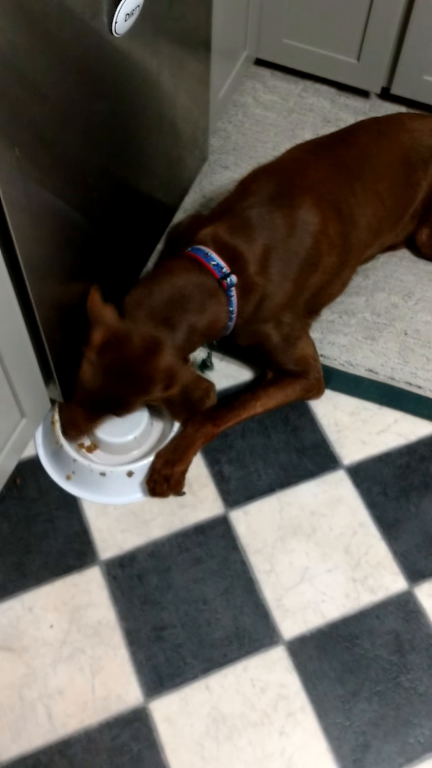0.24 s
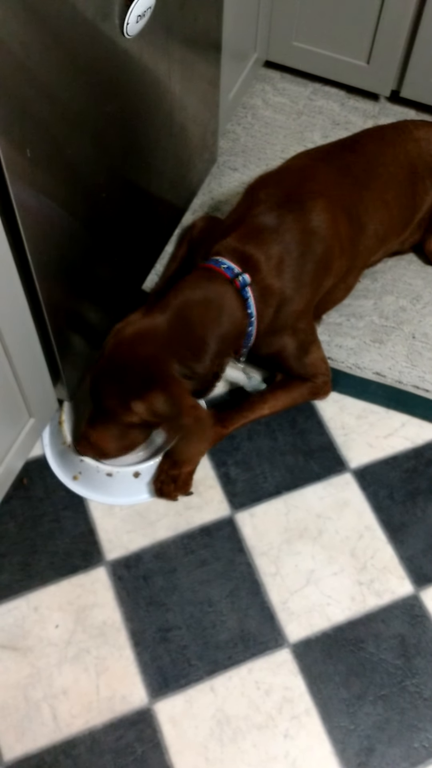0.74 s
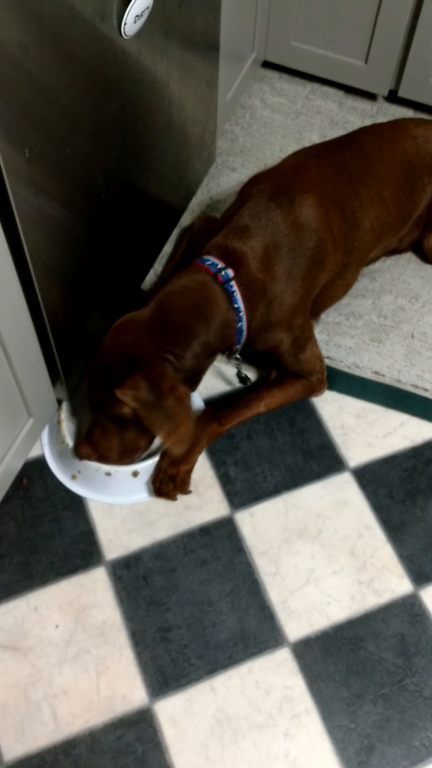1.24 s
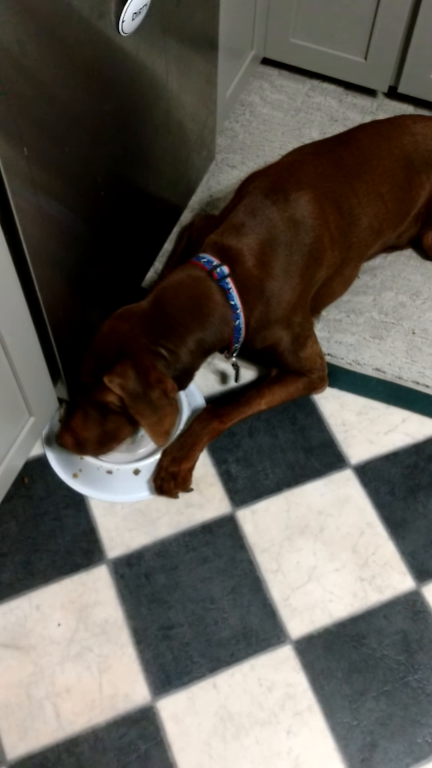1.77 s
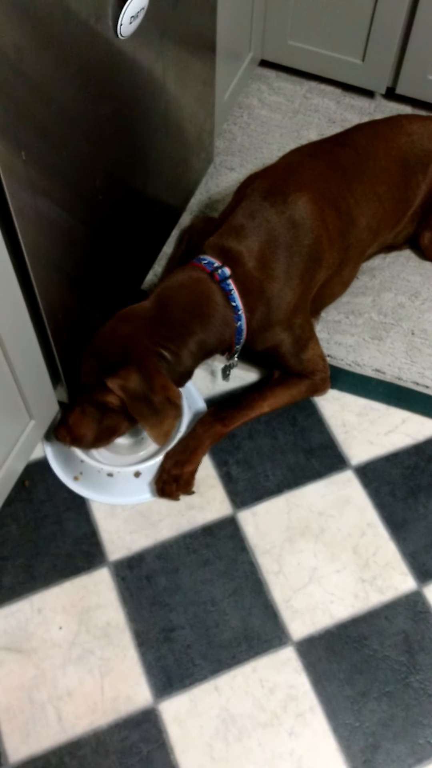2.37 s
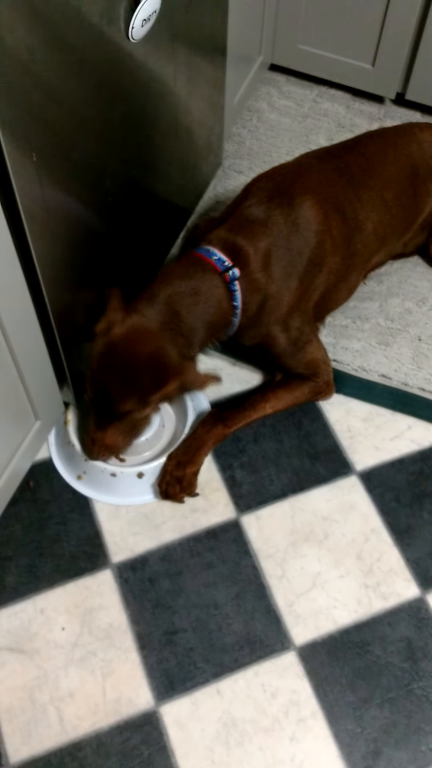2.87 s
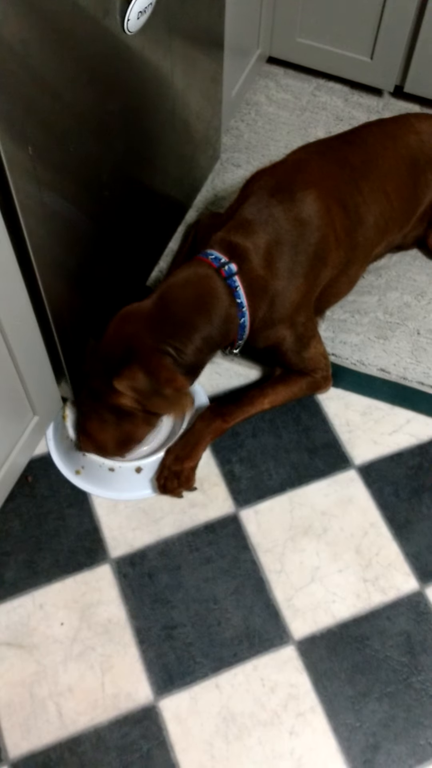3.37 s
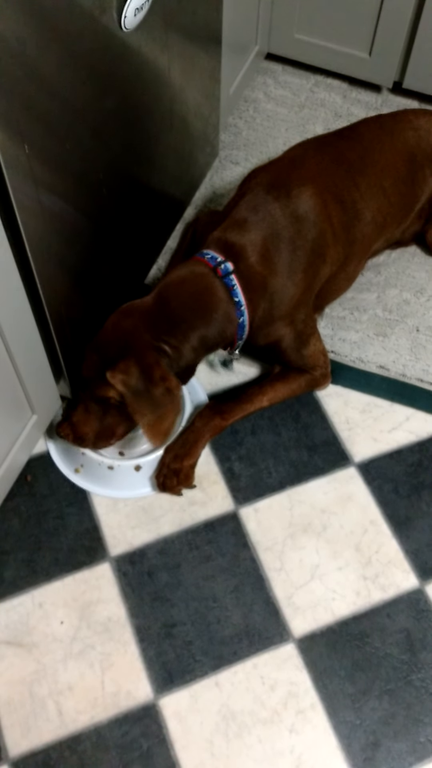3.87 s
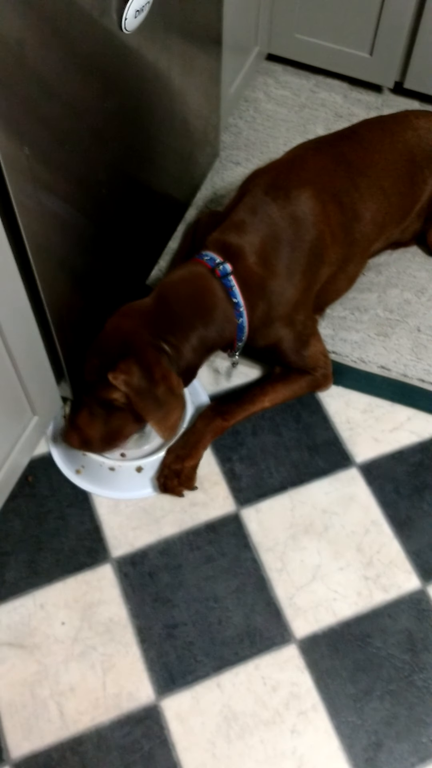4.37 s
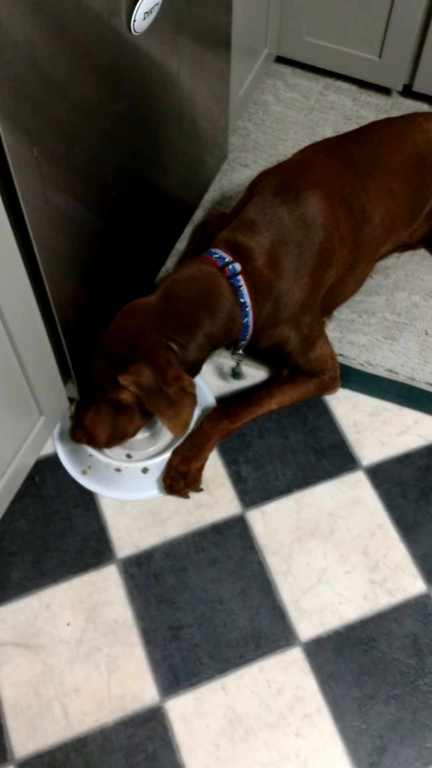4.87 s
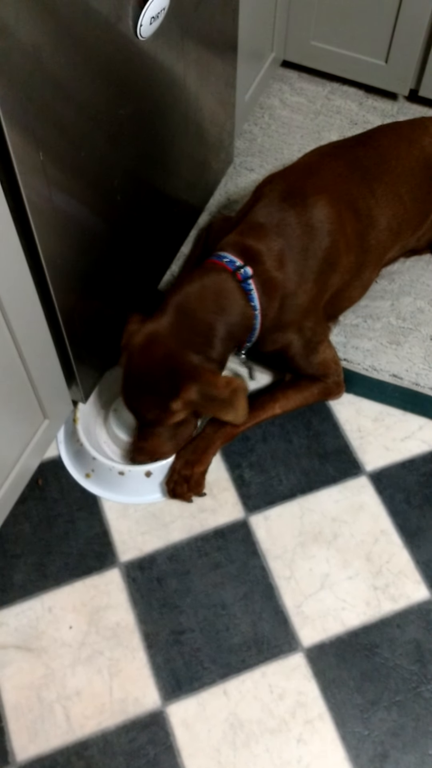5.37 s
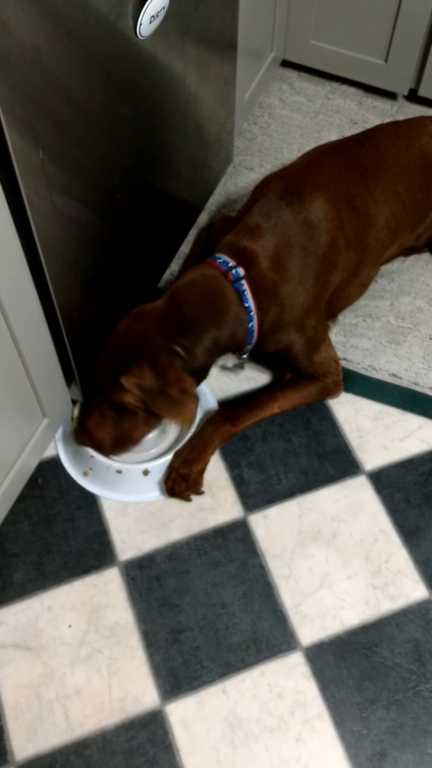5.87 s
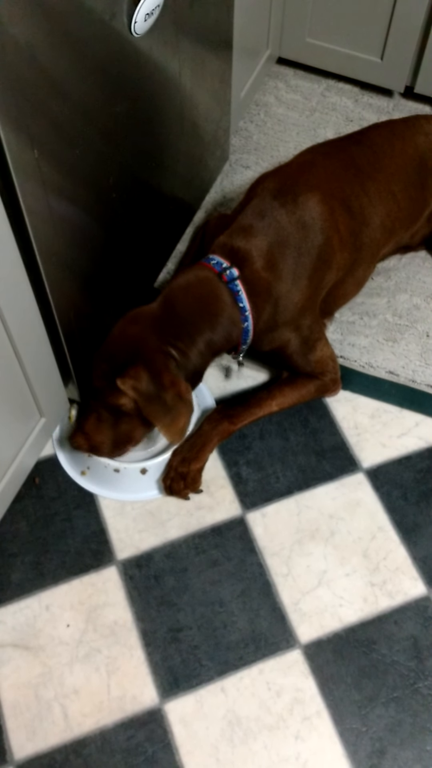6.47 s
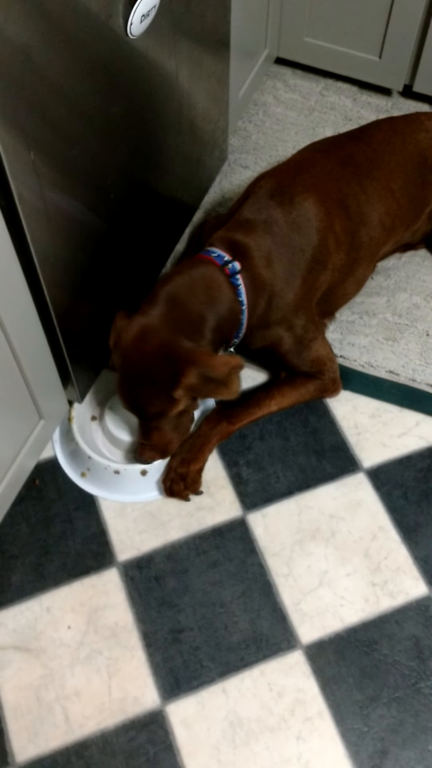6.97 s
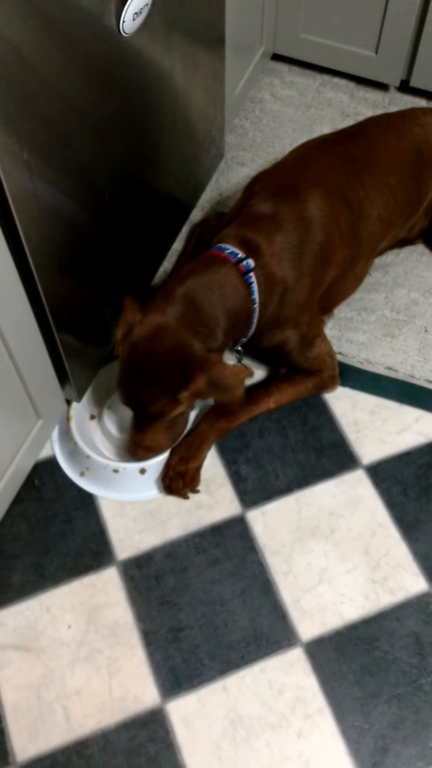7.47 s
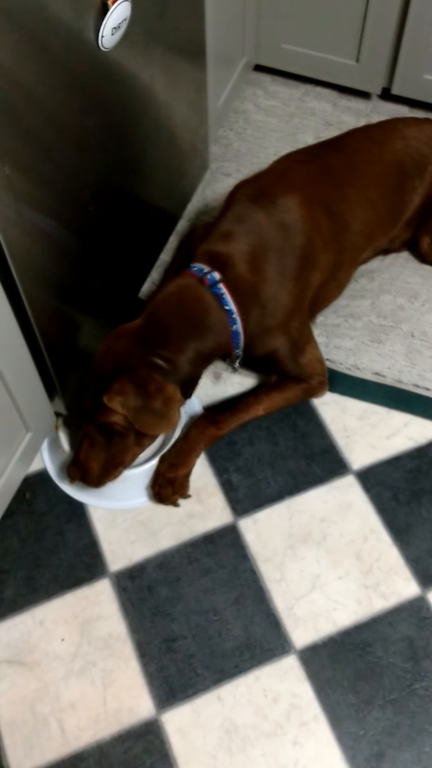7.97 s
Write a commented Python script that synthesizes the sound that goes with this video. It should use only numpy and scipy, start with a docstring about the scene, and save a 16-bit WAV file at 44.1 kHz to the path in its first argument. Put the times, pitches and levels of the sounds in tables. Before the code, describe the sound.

Close to a dog finishing its kibble: sticky tongue pops, saliva crackle and occasional dry cracks of kibble. Thin, very high collar tags clink irregularly throughout. The plastic bowl stand thuds and scuffs in the first seconds, rests, then knocks loudly past the middle and again near the end. The steel dish rings clearly once and scrapes softly. Small hard-floored kitchen, brief reflections, quiet steady air.

```python
"""Dog licking a steel dish clean

A dog licks the last kibble from a steel dish in a plastic stand on a kitchen floor.
Shoves of the muzzle make the stand knock and judder, built from ringing modes and a slipping tone.
Collar tags and the steel dish ring as sets of fading sine waves, started by short contacts.
Smacks and crumbs are gliding or steady pops; licks are sparse clicks shaped by filters.
Floor and cupboards add echoes, with a short room tail and a quiet steady hiss around it all."""
import sys
import numpy as np
from scipy import signal
from scipy.fft import rfft, irfft, next_fast_len
from scipy.io import wavfile

SR = 44100
rng = np.random.default_rng(int(sys.argv[2]) if len(sys.argv) > 2 else 0)


def pcm_store(signal):
    """Save signal as 16-bit PCM."""
    levels = np.round(np.clip(np.atleast_2d(signal), -1, 1) * 32767)
    wavfile.write(sys.argv[1], SR, levels.astype(np.int16).T)


N = 362502
T = np.arange(SR // 2) / SR  # time within one event, in seconds

# All levels in the tables are relative: later gains, filters and the room still act on them.
# Shoves of the muzzle against the stand: start_s, shove_db, floor_thud_db, rim_clack_db,
# judder_db (relative to the shove), slip_hz (middle of a slowing glide)
SHOVES = [(0.0817, -32.5, -29.5, -32, 5.5, 739), (0.1705, -39, -46, -23, -14, 784),
          (0.3332, -29, -29, -27, -10, 713), (0.778, -59, -48, -65, -5, 716),
          (1.1443, -30, -28, -40, -6, 760), (1.5956, -21.5, -26, -17, -5, 817),
          (2.1471, -47, -43.5, -53, -5, 806), (2.63, -46.5, -43, -28, 0, 676),
          (4.203, -53, -58, -40, -3, 800), (5.199, -40.5, -42.5, -56, -22, 920),
          (5.3255, -26, -23, -16.5, 6.5, 801), (5.3695, -41, -33, -39, -6, 790),
          (5.4064, -35.5, -38.5, -27, -16, 810), (5.55, -46.5, -51, -40, -21, 810),
          (5.683, -50, -38, -37, -7, 667), (5.7261, -22, -24, -11, 6.5, 778),
          (7.1931, -32.5, -36.5, -24.5, -7, 800), (7.3187, -28, -19.5, -12.5, 15, 769)]
# Ringing modes of the plastic stand: pitch_hz (before a small random shift), level_db, fade_60db_s
STAND_MODES = [(80, -29, .12), (155, -15, .13), (195, -18, .08), (228, -11, .13), (256, -4, .12),
               (283, -7, .11), (314, -11, .09), (398, 3, .09), (440, -11, .04), (530, -10, .085),
               (620, -17, .04), (720, -9, .04), (830, -10, .04), (972, -8, .08), (1130, -15, .05),
               (1210, -16, .05), (1320, -19, .05), (1420, -19, .05), (1575, -19, .12), (1705, -19, .18),
               (2330, -27, .16)]
# Clinks of the collar tags: start_s, first_tag_db, second_tag_db, bright_pair_db, middle_group_db,
# low_group_db, ring_time_factor
TAG_CLINKS = [(0.1246, -43, -45, -43.5, -49, -39.5, 1.14), (0.247, -36, -42, -34, -50, -47.5, 1.5),
              (0.266, -53, -52, -54, -49, -65, 1.0), (0.282, -61, -54, -56, -47, -48, 2.4),
              (0.4273, -41, -47, -30.5, -62, -49, 1.6), (0.4713, -47, -42, -53, -49, -46, 2),
              (0.5107, -65, -55, -60, -66, -58, 1.6), (0.735, -40, -34, -28, -44, -58, 1.1),
              (0.748, -49, -49, -56, -57, -37, 1.8), (0.7574, -51, -43, -59, -41.5, -66, 1.5),
              (0.787, -62, -61, -56, -64, -61, 1.0), (0.833, -37, -35, -38.5, -37.5, -52, 0.74),
              (0.847, -57, -57, -66, -67, -68, 1.0), (0.8764, -44, -41, -46, -54, -45.5, 0.52),
              (0.897, -62, -63, -61, -71, -54, 0.99), (1.06, -50, -53, -47, -54, -52, 0.8),
              (1.1372, -50, -54, -46, -55, -54, 1.0), (1.1872, -54, -54, -59, -41, -47, 0.85),
              (1.325, -52, -54, -54, -54, -58, 0.85), (1.407, -61, -61, -55, -75, -54.5, 1.7),
              (1.7558, -43, -45, -50.5, -46.5, -56, 1.1), (2.348, -55, -55, -54, -51, -63, 2.1),
              (2.564, -56, -54, -52, -46.5, -65, 1.7), (2.959, -52, -53, -52, -52, -54, 0.84),
              (3.014, -57, -58, -55, -59, -53, 1.3), (3.148, -54, -50, -49.5, -50, -55.5, 2.3),
              (3.281, -48, -51, -50, -41, -54, 1.3), (3.326, -50, -49, -55, -46.5, -58, 1.3),
              (3.41, -55, -60, -57, -61, -57, 1.4), (3.481, -51, -46, -62, -47, -42.5, 0.99),
              (3.7167, -48, -42, -44, -36, -44.5, 0.99), (3.8782, -37, -36, -41, -57, -47, 0.6),
              (4.027, -43, -57, -44, -39, -45, 1.7), (4.0583, -35, -44, -37, -42, -45.5, 0.88),
              (4.144, -46, -47, -49, -51.5, -46.5, 1.6), (4.218, -48, -46, -52, -47, -53, 0.89),
              (4.6122, -49, -54, -50, -43, -65, 0.73), (4.779, -48, -46, -49, -44, -55, 0.75),
              (4.998, -48, -49, -45, -50, -47.5, 1.2), (5.008, -52, -50, -62, -69, -68, 0.96),
              (5.083, -63, -63, -59, -51, -65, 1.0), (5.138, -56, -59, -58, -58, -60, 0.9),
              (5.259, -63, -60, -59, -55, -63, 2.5), (5.419, -58, -58, -61, -76, -75, 1.0),
              (5.7568, -46, -42, -39.5, -45, -45, 0.69), (5.7875, -43, -39, -41, -39, -41.5, 1.44),
              (5.9526, -41, -33.5, -44.5, -54, -42, 0.91), (5.98, -56, -56, -69, -45.5, -45, 1.1),
              (6.0136, -53, -53, -62, -40, -64, 1.1), (6.14, -47, -46, -41.5, -53, -49, 1.4),
              (6.239, -49, -56, -51, -73, -55, 0.9), (6.626, -53, -48, -56, -46.5, -56, 0.97),
              (6.7845, -52, -52, -45, -49, -46.5, 0.81), (6.802, -53, -53, -69, -45, -56, 0.87),
              (6.928, -55, -55, -60, -56, -56, 0.87), (7.042, -63, -65, -64, -69, -63, 1.1),
              (7.103, -61, -62, -81, -69, -76, 1.1), (7.425, -58, -59, -53, -59, -60, 0.84),
              (7.473, -45, -53, -45, -61, -57, 1.2), (7.5335, -54, -47, -55, -54, -58, 0.84),
              (7.582, -59, -56, -63, -62, -60, 0.91), (7.629, -59, -56, -49.5, -49, -62, 1.2),
              (7.755, -66, -66, -63, -60, -68, 0.93), (7.88, -50, -50, -53, -63, -50, 1.3),
              (7.901, -50, -48, -41.5, -74, -43.5, 1.1), (7.935, -55, -53, -64, -54, -49, 1.0)]
# Ringing modes of the tags: pitch_hz (before a small random shift), level_db,
# fade_60db_s (before the clink's factor and random grip),
# family (0 first tag, 1 second tag, 2 bright pair, 3 middle group, 4 low group)
TAG_MODES = [(14560, -1, .09, 0), (15600, -1, .1, 0), (8732, -13, .07, 1), (14280, 0, .11, 1),
             (15730, -4, .13, 1), (12230, -1.5, .11, 2), (12280, -4, .05, 2), (9815, 0, .06, 3),
             (9730, -2, .035, 3), (9500, -2, .012, 3), (6115, -1, .06, 4), (6235, -6, .3, 4),
             (6060, -4, .04, 4), (6710, -3, .03, 4)]
# Touches on the steel dish: start_s, strength_db, softness (0 is neutral), scrape (0 to 1),
# scrape_length_s (time constant of the chatter)
DISH_TOUCHES = [(2.6131, -18.5, 0.19, 0.11, 0.0039), (2.631, -38, 0.12, 0.03, 0.0017),
                (3.415, -47.5, 1.43, 0.23, .003), (3.428, -42, 0.33, 0.3, 0.0026),
                (3.457, -37.5, 0.1, 0.7, .004), (3.5005, -36.5, 0.3, 0.8, .003),
                (3.51, -42, 0.39, 1, 0.0057), (5.324, -43.5, 1.5, 0.42, 0.0098),
                (5.703, -39, 0.45, 0.35, 0.0061), (7.314, -41.5, 0.42, 0.5, .01)]
# Ringing modes of the dish: pitch_hz, level_db, fade_60db_s (for a clean blow)
DISH_MODES = [(1701, -32, .5), (1745, -32, .2), (2611, -35, .3), (3208, -20, .35), (3532, -26, .35),
              (3589, -12.5, .4), (3612, -21, .25), (4568, -14, .2), (4613, -21, .2), (4880, -10, .12),
              (4926, 2.5, .165), (5028, -6, .17), (5110, -12, .14), (5286, -17, .18), (5690, -16, .1),
              (5766, -7, .2), (5815, -13, .12), (5862, -9, .18), (5990, -11, .2), (6115, -13, .17),
              (6207, -15, .22), (6720, -19, .12), (6944, -19, .15), (7224, -14, .12), (7800, -24, .2),
              (8424, -29, .2)]
# Teeth closing on kibble: start_s, strength_db, dish_contact (0 to 1)
KIBBLE_BITES = [(0.171, -42, 1), (0.334, -34.5, 0.87), (0.6485, -46, 0.66), (1.148, -40.5, 0.1),
                (1.6976, -42.5, 0.14), (2.0874, -48, 1), (2.273, -42, 0.43), (2.614, -40, 0.9),
                (3.1023, -45.5, 0.54), (3.2748, -42, 0.86), (3.698, -46, 0), (4.1871, -47, 1),
                (4.2018, -47, 1), (4.6561, -37, 0.83), (5.4529, -42.5, 0.2), (6.2355, -35, 0.78),
                (6.648, -40, 0.1), (7.056, -49, 0.3), (7.4032, -49, 1), (7.251, -49.5, 0.7),
                (8.0558, -38.5, 0.5)]
# Tongue smacks: start_s, strength_db, cavity_pitch_hz (centre of the rising glide)
TONGUE_SMACKS = [(0.648, -36, 870), (0.664, -43, 820), (0.849, -42.5, 920), (1.029, -43.5, 900),
                 (1.821, -43, 782), (2.086, -36.5, 1270), (2.761, -40, 930), (2.894, -41, 704),
                 (3.146, -48.5, 870), (3.697, -38, 895), (3.891, -40, 1460), (4.051, -40, 800),
                 (4.07, -40.5, 890), (4.186, -35.5, 1504), (4.201, -43, 910), (4.291, -34, 860),
                 (4.367, -44, 1550), (4.573, -38.5, 826), (4.844, -44.5, 795), (5.054, -40.5, 820),
                 (5.067, -39.5, 980), (5.187, -33.5, 1006), (5.199, -37, 1125), (6.657, -43.5, 776),
                 (6.802, -38.5, 1080), (6.884, -45, 1140), (7.11, -45, 960), (7.82, -42.5, 874),
                 (8.056, -35, 850)]
# Wet tongue strokes: mark_s (the sound starts 8 ms earlier), strength_db,
# spray_db (relative to the strength), length_s
TONGUE_STROKES = [(1.027, -42.5, -13.5, 0.031), (1.495, -50, -10, 0.028), (2.218, -45, -19, 0.034),
                  (2.511, -43, -23, 0.037), (2.837, -48.5, -17, 0.11), (2.968, -42.5, -5.5, 0.041),
                  (3.406, -42.5, -25, 0.04), (3.597, -42.5, -26, 0.031), (3.892, -45, -32, 0.024),
                  (4.361, -42, -35, 0.02), (4.53, -52.5, -2.5, 0.045), (4.83, -44.5, -12, 0.02),
                  (5.047, -43, -19, 0.027), (6.105, -42, -31, 0.048), (6.429, -44.5, -36, 0.071),
                  (6.65, -46, -18, 0.067), (6.799, -49, -33, 0.064), (7.056, -41, -13, 0.039),
                  (7.807, -44.5, -20, 0.053)]
# How busily the tongue works between strokes: time_s, level_db
TONGUE_EFFORT = [(0.0, -47.5), (0.2, -50), (0.89, -68), (1.14, -56), (2.83, -51.5), (2.95, -60),
                 (5.91, -53), (6.14, -57), (7.08, -58), (7.38, -48), (7.74, -55), (8.2, -54.5)]
# Soaked crumbs giving way: start_s, strength_db, pitch_hz
CRUMB_BREAKS = [(0.602, -42.5, 1860), (1.1552, -36.5, 1390), (1.283, -39, 2650), (1.2992, -39, 1930),
                (1.7268, -35, 2220), (1.7706, -47, 1530), (2.614, -31.5, 1273), (2.97, -43, 1540),
                (2.982, -42.5, 3220), (3.2338, -35.5, 1940), (3.787, -39, 4170), (3.911, -43, 1570),
                (4.248, -44.5, 1390), (4.377, -46.5, 2960), (6.4822, -49, 1090), (6.697, -44, 898),
                (7.0552, -44, 3260), (7.067, -42, 3100), (7.082, -36.5, 2410), (7.115, -41, 1710),
                (7.147, -52, 1960), (7.309, -35.5, 2020), (8.0558, -32, 1640)]
# Tone colour of wet sound inside the mouth: pitch_hz, level_db per Hz
MOUTH_COLOUR = [(30, -59), (100, -22), (400, -1), (850, 13), (1150, 3.5), (1500, 0), (2000, 4.5),
                (2500, -11), (3200, -5.5), (8000, -7), (16000, -9)]
# Tone colour of bright spray and snaps: pitch_hz, level_db per Hz
SPRAY_COLOUR = [(100, -7), (1500, -34), (3000, -6.5), (5000, 9.5), (7500, 10), (11000, 2.5), (16000, -23)]
# Tone colour of the quiet kitchen: pitch_hz, level_db per Hz
HUSH_COLOUR = [(20, -14), (45, -5.5), (75, 2.5), (130, 1), (220, 6.5), (400, 3.5), (650, -4), (1200, -9),
               (2000, -17), (3200, -18), (5500, -17.5), (10000, -10.5), (16000, -15.5)]
# Modes of a tooth's tap on the dish: pitch_hz, level_db, fade_60db_s
TOOTH_TAP = [(262, -50, 0.075), (512.5, -4.5, 0.085), (855, 6, 0.006)]
# Echoes from floor and cupboards: delay_s, gain (before each source's own share)
NEAR_ECHOES = [(.0037, 0.65), (.0076, 0.23), (0.01, 0.083), (0.0235, 0.28), (0.04, 0.51)]
# How fast the room tail fades: pitch_hz, fade_60db_s
ROOM_FADE = [(150, 0.23), (400, 0.3), (1000, 0.24), (4000, 0.22), (15000, 0.2)]
# Left-right likeness of diffuse sound: pitch_hz, likeness (limited to -1 to 1 in use)
SIDE_LIKENESS = [(50, -1.12), (130, -0.37), (280, 0.67), (650, 0.87), (1400, 0.6), (3000, 0.66),
                 (16000, -0.79)]
# Level difference between the sides: pitch_hz, left_minus_right_db
SIDE_BALANCE = [(100, -4.5), (280, -4), (600, -1.2), (1100, .9), (4500, -.5), (8000, 2.3), (14000, 1.3)]
# Bands where left and right are in opposite phase, from stereo widening: centre_hz, half_width_hz
OPPOSED_BANDS = [(2200, 500), (4340, 400), (6480, 420), (8570, 440), (13500, 400)]
# Phase between left and right outside those bands: pitch_hz, phase_radians
SIDE_PHASE = [(200, 0.4), (500, -0.3), (1500, 0.3), (3200, 0.05), (7500, 0.3), (9800, 0.9), (12200, 0.1),
              (14500, 1), (16000, 0.3)]

EDGE_HZ = 16050  # upper limit of the sound
# Faint brushes between tags: average rate, relative level of each tag family
GRAZES_PER_S, GRAZE_DB = 2.7, (-55, -51, -52, -72, -85)
SNAP_DB, SNAP_CONTACT_DB = -5, 7  # bright snap in the mouth, and what full dish contact adds
TAP_DB, TAP_CONTACT_DB = -24.5, 35.5  # the same for the tap on the dish
UPPER_HZ, UPPER_SPREAD, UPPER_DB = 1333, 0.093, -11  # second mouth resonance, its variation, level
REBOUNDS, REBOUND_S, REBOUND_GAIN = 4, .034, 0.34  # stand rocking back: count, time span, strength
SPOT_DB, TAG_SPOT_DB = 2, 2  # random spread of mode levels from hit to hit: stand, tags
TAG_GRIP, TAG_BOUNCE = .25, .15  # random spread of tag ring time, strength of a bounce


def amp(db):
    """Turns decibels into gain."""
    return 10 ** (np.asarray(db) / 20)


def unit(x):
    """Scales a sound to an rms strength of 1."""
    return x / np.sqrt(np.mean(x ** 2) + 1e-20)


def read(points, hz):
    """Reads a table by joining its points along a log-frequency axis."""
    f, value = np.transpose(points)
    return np.interp(np.log(hz + 1), np.log(f + 1), value)


def add(mix, s, sound):
    """Mixes a sound in at time s, cutting off what runs past the end."""
    part = mix[max(round(s * SR), 0):][:len(sound)]
    part += sound[:len(part)]


def colour(x, spectrum):
    """Gives a sound a tone colour with a unit-energy filter that never acts ahead of time."""
    log_gain = np.log(amp(read(spectrum, abs(np.fft.fftfreq(2048, 1 / SR)))))
    # The Hilbert transform finds the phase that puts the energy as early as possible.
    response = np.exp(np.conj(signal.hilbert(log_gain)))
    taps = np.fft.ifft(response).real[:1024]
    return signal.oaconvolve(x, taps / np.linalg.norm(taps))[:len(x)]


def ring(hz, db, t60, sign=1):
    """Sets modes ringing with one blow; each is a fading sine starting outward or inward."""
    waves = np.sin(2 * np.pi * np.outer(hz, T))
    fades = np.exp(-np.log(1000) * np.outer(1 / t60, T))
    return (sign * amp(db)) @ (waves * fades)


def burst(t60):
    """A puff of noise that falls by 60 dB in t60 seconds."""
    return rng.standard_normal(len(T)) * np.exp(-np.log(1000) * T / t60)


def crackle(size, per_s, spread_db):
    """Sparse random clicks of very unequal strength."""
    strength = amp(spread_db * np.minimum(rng.exponential(1, size), 4))
    happens = rng.random(size) < per_s / SR
    return unit(strength * rng.standard_normal(size) * happens)


def pop(hz, cycles=3.34, glide=0.16):
    """A film of saliva or a crumb bursts: a few fading cycles that may bend up or down."""
    t = T[:SR // 40]
    age = t * hz / cycles
    bend = glide * rng.standard_normal() * np.tanh(age / 2)
    turns = np.cumsum(hz * (1 + bend)) / SR
    return np.sin(2 * np.pi * turns) * np.exp(-age) * (1 - np.exp(-age * 10))


def diffuse(pair):
    """Mixes two unrelated signals so the likeness of left and right varies with pitch."""
    left, other = rfft(pair)
    same = np.clip(read(SIDE_LIKENESS, np.fft.rfftfreq(pair.shape[1], 1 / SR)), -1, 1)
    right = same * left + np.sqrt(1 - same ** 2) * other
    return irfft([left, right], pair.shape[1])


def hush(level_db=-54.0):
    """The steady air of the kitchen and a fine hiss, made from filtered noise."""
    noise = np.array([colour(v, HUSH_COLOUR) for v in rng.standard_normal((2, N))])
    return amp(level_db) * diffuse(noise)


def licks(mouth_db=-7, steady_db=-6, fizz_db=-13):
    """Saliva crackles in the mouth, faintly all the time and more strongly with each stroke."""
    out = np.zeros(N)
    for s, peak_db, spray_db, length in TONGUE_STROKES:
        stroke = signal.windows.tukey(int(length * SR), .7)
        wet = amp(peak_db + mouth_db) * colour(crackle(len(stroke), 2200, 2.1), MOUTH_COLOUR)
        spray = amp(peak_db + spray_db) * colour(crackle(len(stroke), 6000, 1.5), SPRAY_COLOUR)
        add(out, s - .008, stroke * (wet + spray))
    effort = amp(np.interp(np.arange(N) / SR, *np.transpose(TONGUE_EFFORT)))
    steady = amp(steady_db) * colour(crackle(N, 1500, 1.2), MOUTH_COLOUR)
    fizz = amp(fizz_db) * colour(crackle(N, 1200, 0.49), SPRAY_COLOUR)
    return out + effort * (steady + fizz)


def chewing(level_db=2, per_s=75, spread_db=2.5, centre_hz=1300, spread=0.564):
    """Tiny wet pops at random pitches and moments, stronger when the tongue is busier."""
    out = np.zeros(N)
    times = np.flatnonzero(rng.random(N) < per_s / SR) / SR
    for s in times:
        effort_db = np.interp(s, *np.transpose(TONGUE_EFFORT))
        size_db = effort_db + spread_db * min(rng.exponential(), 3)
        hz = centre_hz * np.exp(spread * np.clip(rng.standard_normal(), -2, 2))
        add(out, s, amp(level_db + size_db) * pop(hz))
    return out


def knocks(level_db=-3, rise=0.001, rattle_db=-11, rim_db=-11, skid_db=6, skid_s=0.01053,
           overtones_db=(-21, -42), deep_db=-7, spot_shift=0.015, sag=0.062):
    """A shove makes the stand judder along the floor and thud; it rocks back and its rim rattles."""
    out = np.zeros(N)
    hz, db, t60 = np.transpose(STAND_MODES)
    progress = np.minimum(T / skid_s, 1)
    # The feet slip at a steady strength, then grip; the slip rate falls along the way.
    sliding = np.tanh(3 * np.sin(np.pi * progress) ** 2)
    slowing = np.cumsum(1 + sag * (1 - 2 * progress)) / SR
    inward = np.where((hz > 350) & (hz < 450), -1, 1)
    rim_colour = [(100, -12), (500, -1), (1000, 0), (1700, -10), (2400, -20), (6000, -29), (16000, -42)]
    for s, body_db, thud_db, clack_db, slip_db, slip_hz in SHOVES:
        judder_db = body_db + slip_db
        # Floor thud drives the low modes, the shove the middle, judder and rim the high ones.
        drive = [(85, thud_db + deep_db), (260, thud_db), (320, body_db), (400, body_db),
                 (550, (body_db + judder_db) / 2 - 1), (700, judder_db), (900, judder_db),
                 (1200, clack_db + rim_db)]
        blow_db = db + read(drive, hz)
        spot, shift = rng.standard_normal((2, len(hz)))  # the muzzle presses on a different spot
        body = ring(hz * (1 + spot_shift * shift), blow_db + SPOT_DB * spot + 4.5, t60, inward)
        slips = sum(amp(d) * np.sin(2 * np.pi * k * slip_hz * slowing)
                    for k, d in enumerate((0, *overtones_db), 1))
        judder = amp(judder_db + skid_db) * sliding * slips
        rattle = colour(crackle(len(T), 900, 2) * np.exp(-T / .011) * 1.1, rim_colour)
        impact = amp(clack_db + rattle_db) * rattle - body
        add(out, s, impact * (1 - np.exp(-T / rise)) - judder)
        for late in rng.uniform(.25, 1, REBOUNDS):
            rock_db = blow_db + SPOT_DB * rng.standard_normal(len(hz))
            rock = ring(hz, rock_db, t60 / 2, rng.choice([-1, 1], len(hz)))
            add(out, s + late * REBOUND_S, REBOUND_GAIN * np.exp(.5 - late) * rock)
    high_pass = signal.butter(3, 90, "high", fs=SR, output="sos")
    return amp(level_db) * signal.sosfilt(high_pass, out)


def grazes():
    """Lists faint clinks at random moments, when the tags just brush each other."""
    times = np.flatnonzero(rng.random(N) < GRAZES_PER_S / SR) / SR
    return [(s, *GRAZE_DB, 1) for s in times]


def tags(strike_db=(2, 1, 3, 1, 0), tick_db=2, slide=0.0025):
    """Metal tags meet at a different spot each time and bounce once, so their ring keeps changing."""
    out = np.zeros(N)
    hz, db, t60, family = np.transpose(TAG_MODES)
    tick_colour = [(500, -40), (4500, 1), (6200, 10), (9500, 14), (11000, 9), (14500, 13), (16000, 3)]
    for s, *family_db, hang in TAG_CLINKS + grazes():
        blow_db = db + np.add(family_db, strike_db)[family.astype(int)]
        for delay, strength in (0, 1), (rng.uniform(0.0027, 0.035), TAG_BOUNCE):
            spot, detune, free = rng.standard_normal((3, len(hz)))
            ring_s = t60 * hang * np.exp(TAG_GRIP * free)  # leaning tags ring longer or shorter
            modes = ring(hz * (1 + slide * detune), blow_db + TAG_SPOT_DB * spot, ring_s)
            tick = amp(np.mean(family_db) + tick_db) * colour(burst(0.022), tick_colour)
            add(out, s + delay, strength * (modes + tick))
    return out


def bites(crack_db=0):
    """Kibble breaks with a dry crack in the mouth, a bright snap and a tap passed on to the dish."""
    out = np.zeros(N)
    crack_colour = [(50, -87), (200, -94), (800, -5.5), (1400, 14.5), (1900, 0.5), (3000, -3.0),
                    (16000, 0.0)]
    for s, peak_db, contact in KIBBLE_BITES:
        snap_db = peak_db + SNAP_DB + contact * SNAP_CONTACT_DB
        tap_db = peak_db + TAP_DB + contact * TAP_CONTACT_DB
        crack = amp(peak_db + crack_db) * colour(burst(.016), crack_colour)
        snap = amp(snap_db) * colour(burst(0.022), SPRAY_COLOUR)
        tap = amp(tap_db) * ring(*np.transpose(TOOTH_TAP))
        add(out, s, crack + snap + tap)
    return signal.sosfilt(signal.butter(2, 170, "high", fs=SR, output="sos"), out)


def crumbs(level_db=5, spread=0.41, cluster_s=0.0054, after_db=-8, count=5):
    """Soaked crumbs give way between the teeth: one crisp tick and a quick cluster of others."""
    out = np.zeros(N)
    for s, peak_db, hz in CRUMB_BREAKS:
        add(out, s, amp(peak_db + level_db) * pop(hz, cycles=2.6, glide=0))
        after_gain = amp(peak_db + level_db + after_db)
        for late, pitch, size in zip(rng.random(count), *rng.standard_normal((2, count))):
            tick = pop(hz * np.exp(spread * pitch), cycles=1.8, glide=0)
            add(out, s + cluster_s * late ** 2, after_gain * size * tick)
    return out


def smacks(level_db=0, swell=0.0019, glide=0.077, rough=0.14, crunch_db=-7, crunch_s=.02,
           spread=0.304, count=4):
    """The tongue peels off and the opening mouth pops in two rising resonances; small pops follow."""
    out = np.zeros(N)
    # Shared by both resonances: time stretched so that pitch rises as the mouth opens.
    turns = 2 * np.pi * np.cumsum(1 + glide * np.tanh(T / swell / 2 - 1)) / SR
    for s, peak_db, low_hz in TONGUE_SMACKS:
        upper_hz = UPPER_HZ * (1 + UPPER_SPREAD * rng.standard_normal())
        low = np.sin(low_hz * turns) + rough * colour(rng.standard_normal(len(T)), MOUTH_COLOUR)
        upper = np.sin(upper_hz * turns)
        cavity = amp(peak_db + level_db) * low + amp(peak_db + UPPER_DB) * upper
        add(out, s, cavity * T / swell * np.exp(1 - T / swell))
        for late, pitch, size in zip(rng.random(count), *rng.standard_normal((2, count))):
            small_pop = pop(low_hz * np.exp(spread * pitch))
            add(out, s + crunch_s * late, amp(peak_db + crunch_db) * size * small_pop)
    return out


def dish(level_db=-4, tick_db=-9, chatter_per_s=300, thump_db=-27, soften_db=22, damping=5.3):
    """The steel dish rings: a clean blow is one contact; a scrape is a chatter damped by the muzzle."""
    out = np.zeros(N)
    hz, db, t60 = np.transpose(DISH_MODES)
    # A soft touch favours the lowest modes.
    low = read([(1700, 1.15), (3200, .2), (3600, 0), (4900, -.1), (6000, .25), (7200, 0)], hz)
    # The stand takes up the blow.
    thump = colour(burst(0.71), [(20, -39), (60, -9), (110, 1.5), (220, 3.5), (600, -41), (16000, -82)])
    for s, peak_db, soft, scrape, length in DISH_TOUCHES:
        chatter = crackle(len(T), chatter_per_s, 1.3) * np.exp(-(T / length) ** 2)
        chatter *= scrape / (np.linalg.norm(chatter) + 1e-9)
        tick = amp(tick_db) * colour(burst(0.046), SPRAY_COLOUR)
        sound = amp(thump_db) * (1 - scrape) * thump + tick
        for mode in zip(hz, db + soft * soften_db * low, t60 / (1 + damping * scrape)):
            # Every contact lands on another spot, so each mode gets its own random strengths.
            contact = (chatter * rng.standard_normal(len(T)))[:SR // 20]
            contact[0] += 1 - scrape
            mode_ring = ring(*np.array(mode)[:, None])
            sound += signal.fftconvolve(contact, mode_ring)[:len(T)]
        add(out, s, amp(peak_db) * sound * (1 - np.exp(-T / 0.00039)))
    return amp(level_db) * out


def kitchen(x, near, wet_db):
    """Adds echoes from floor and cupboards and a short diffuse tail to the direct sound."""
    hz, t, z = signal.stft(rng.standard_normal((2, len(T))), SR, nperseg=256)
    fade = np.exp(-np.log(1000) * t / read(ROOM_FADE, hz)[:, None])
    tail = signal.istft(z * fade, SR, nperseg=256)[1][:, :len(T)]
    tail = diffuse(tail * (1 - np.exp(-(T / 0.0017) ** 2)))
    response = amp(wet_db) * tail / np.linalg.norm(tail[0])
    response[:, 0] += 1  # direct sound
    for delay, gain in NEAR_ECHOES:
        response[:, round(delay * SR)] += near * gain
    return signal.oaconvolve(x[None], response, axes=1)[:, :N]


def scene():
    """Sums stand, metal and mouth, each with its own share of room sound, and the hush."""
    stand = kitchen(knocks(), near=0.24, wet_db=-6.5)
    collar = kitchen(tags(), near=0.097, wet_db=-2.0)
    steel = kitchen(dish(), near=0.69, wet_db=0.5)
    mouth_sounds = bites() + crumbs() + smacks() + licks() + chewing()
    mouth = kitchen(mouth_sounds, near=0.017, wet_db=-4.0)
    return stand + collar + steel + mouth + hush()


def record(dry):
    """Stereo widening: left and right differ in level, with opposite phase in a few bands; then a treble limit."""
    size = next_fast_len(N + 4096)
    hz = np.fft.rfftfreq(size, 1 / SR)
    opposed = sum(np.exp(-((hz - centre) / width) ** 6) for centre, width in OPPOSED_BANDS)
    phase = np.pi * opposed + (1 - opposed) * read(SIDE_PHASE, hz)
    # Each side takes half of the level and phase difference.
    gains = amp(np.outer([.5, -.5], read(SIDE_BALANCE, hz)))
    sides = gains * np.exp(1j * np.outer([-.5, .5], phase))
    heard = irfft(rfft(dry, size) * sides, size)[:, :N]
    low_pass = signal.firwin(255, EDGE_HZ, window=("kaiser", 8), fs=SR)
    return signal.oaconvolve(heard, low_pass[None], "same")


dry = scene()
out = record(dry)
pcm_store(out)
```